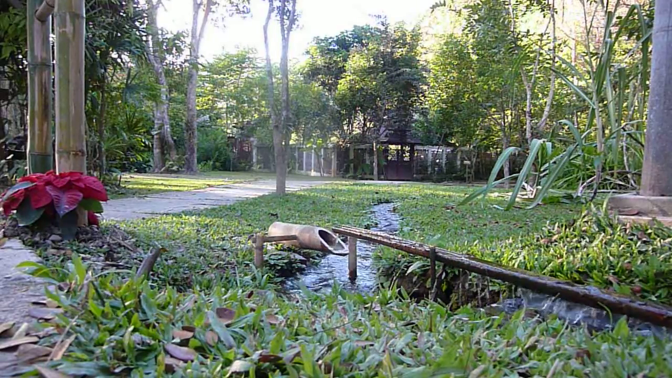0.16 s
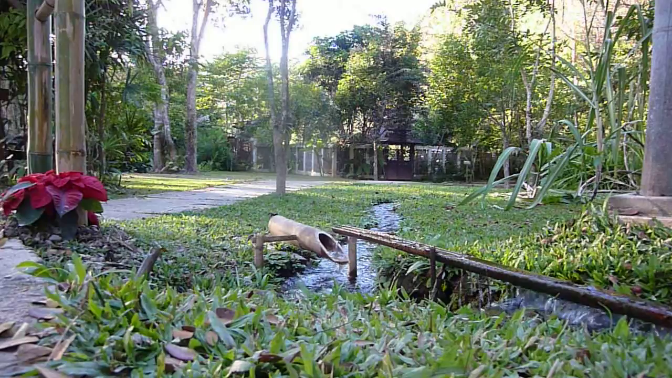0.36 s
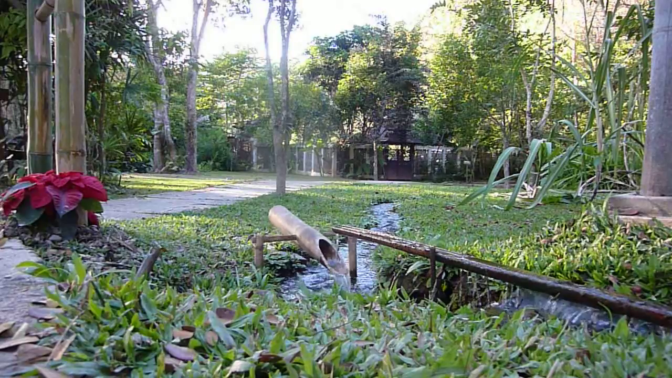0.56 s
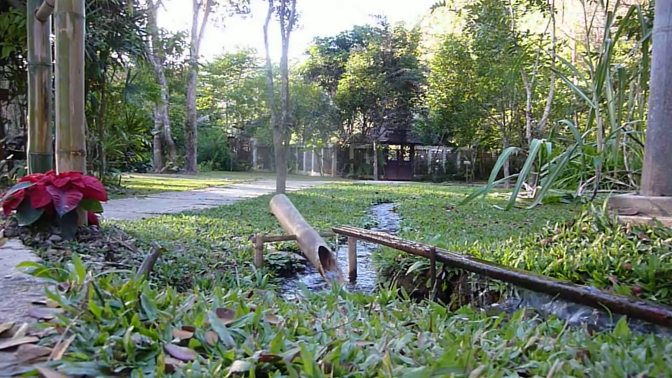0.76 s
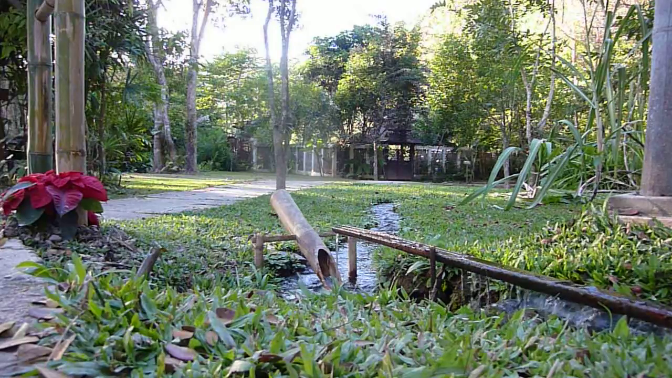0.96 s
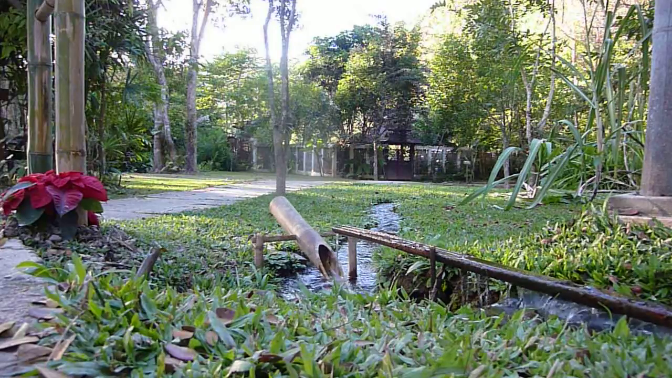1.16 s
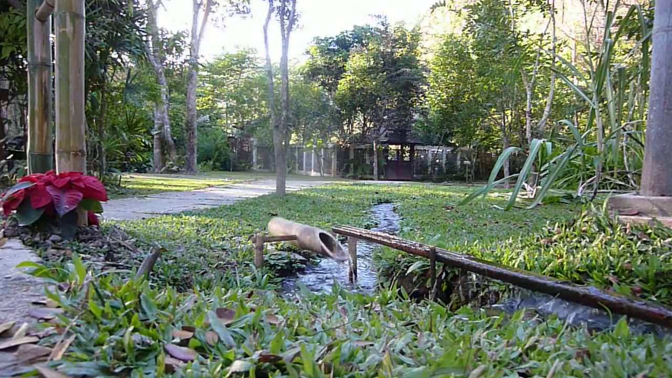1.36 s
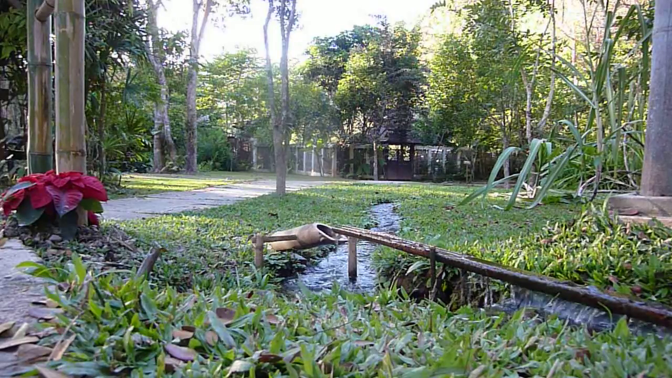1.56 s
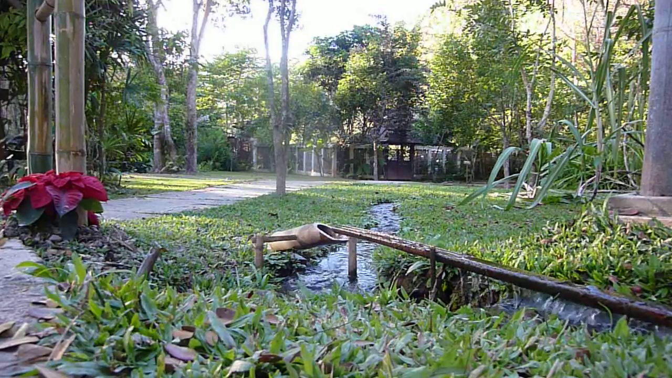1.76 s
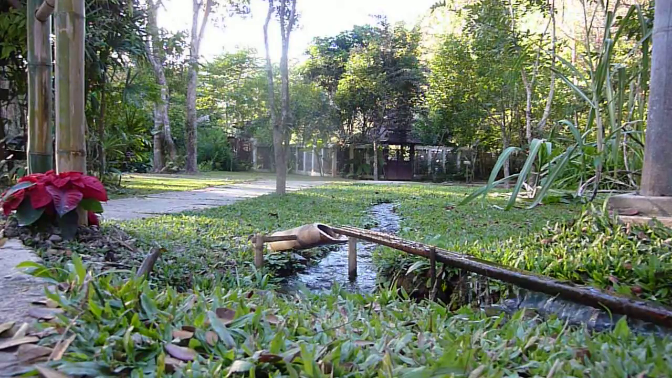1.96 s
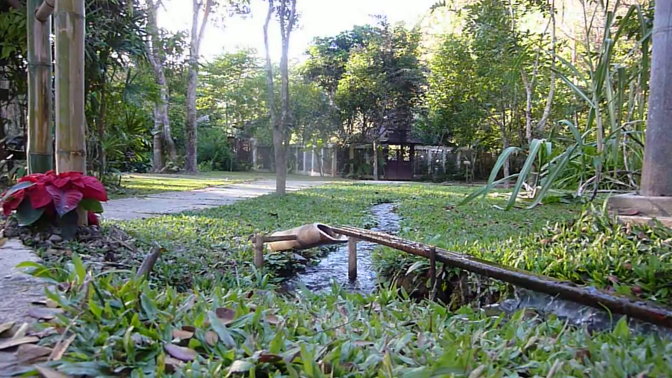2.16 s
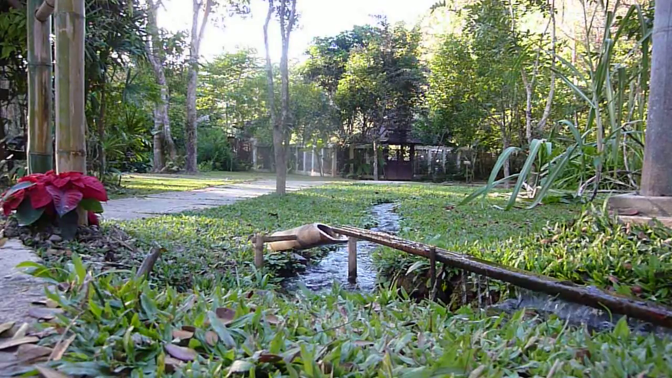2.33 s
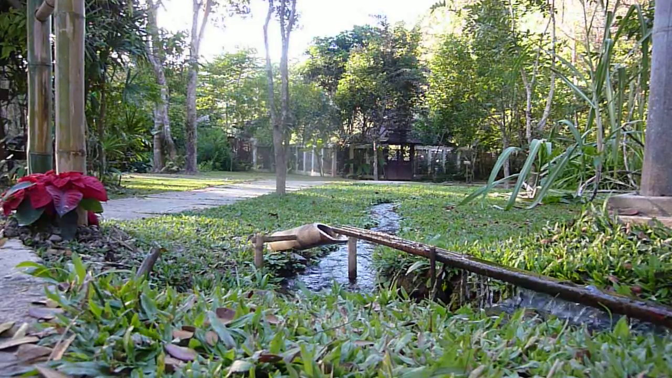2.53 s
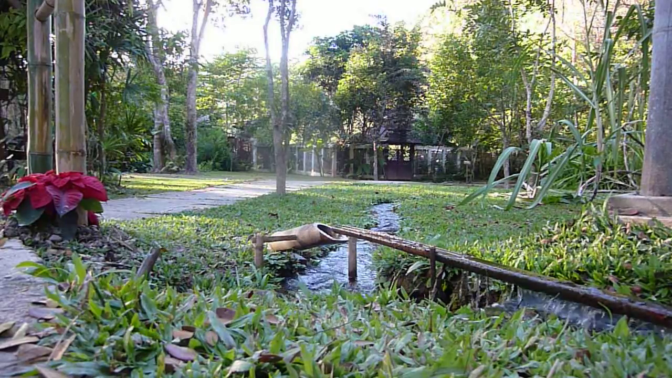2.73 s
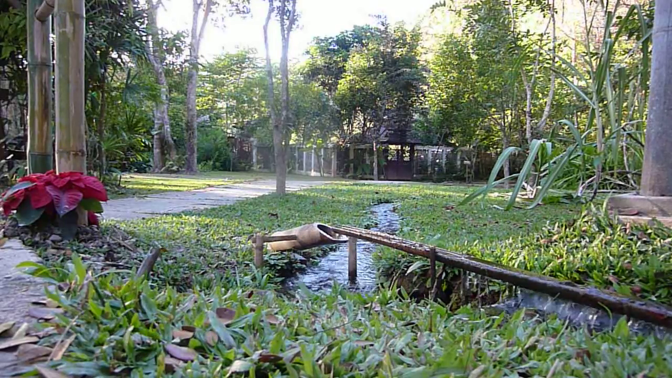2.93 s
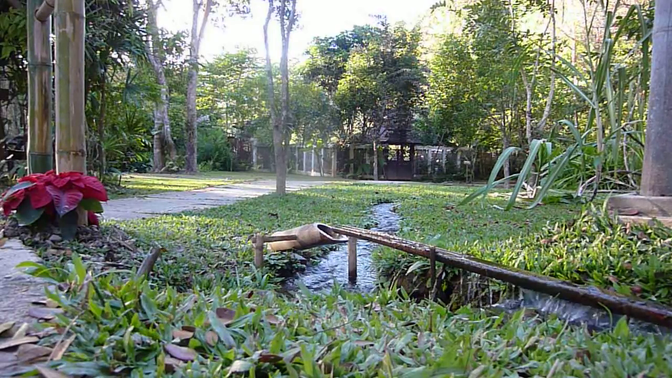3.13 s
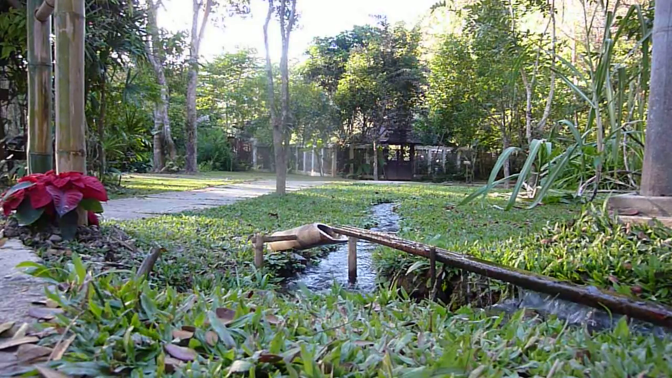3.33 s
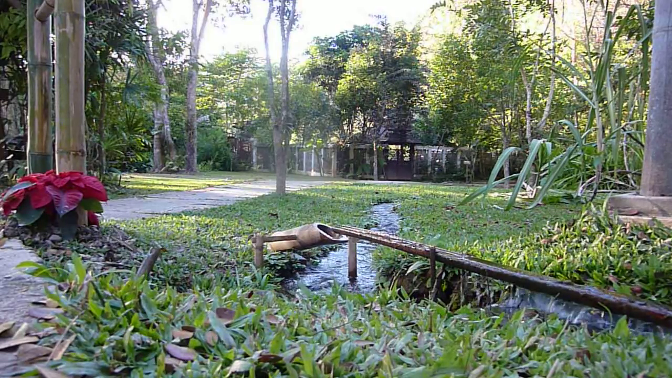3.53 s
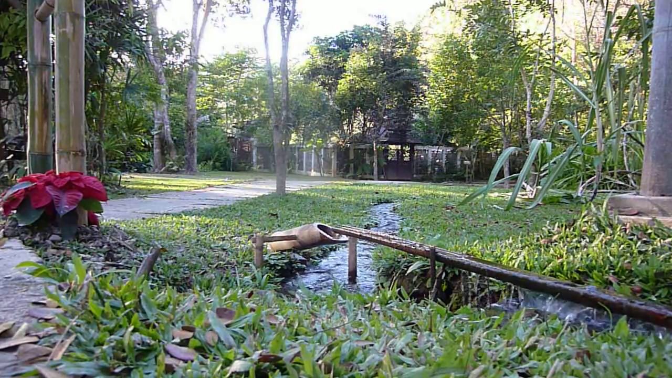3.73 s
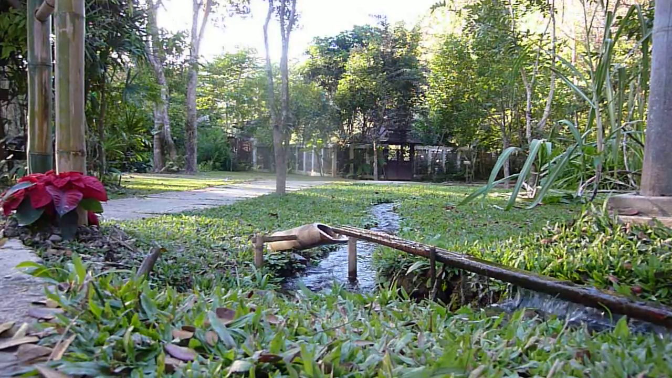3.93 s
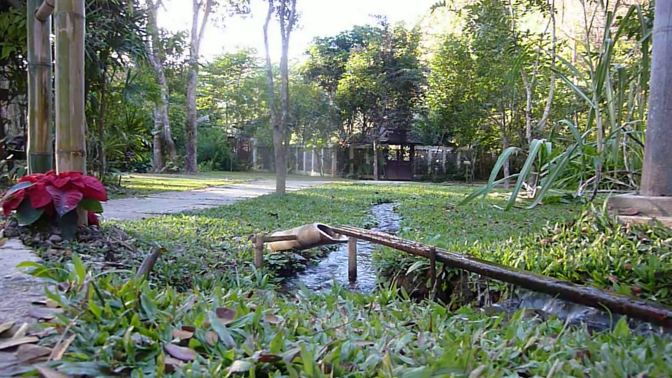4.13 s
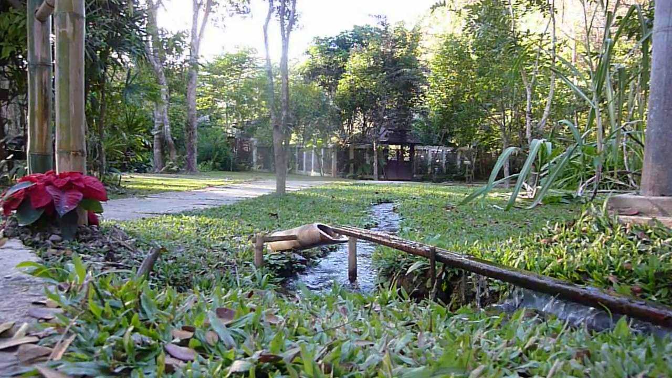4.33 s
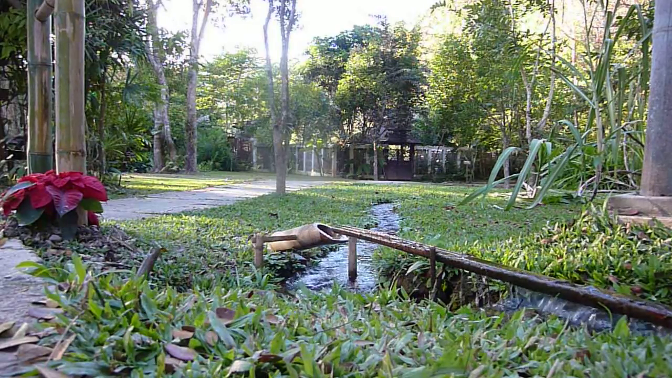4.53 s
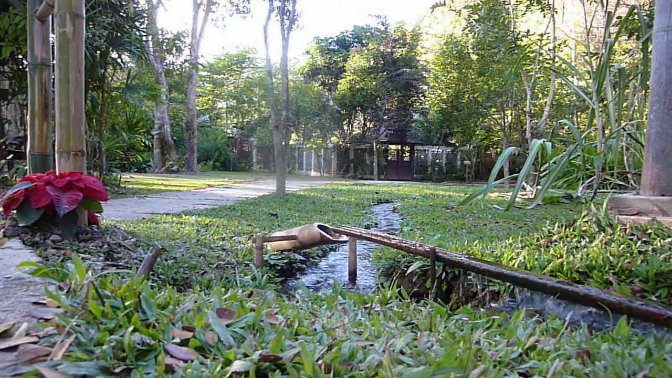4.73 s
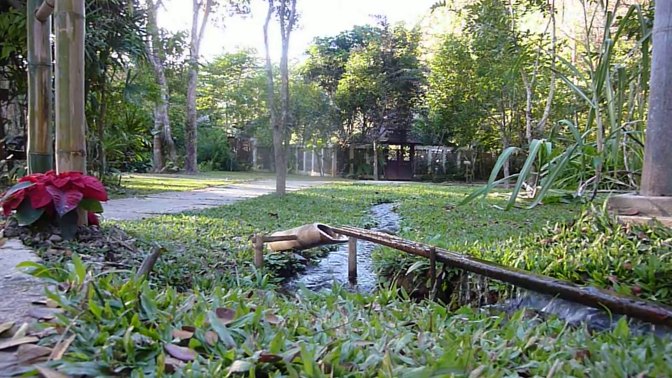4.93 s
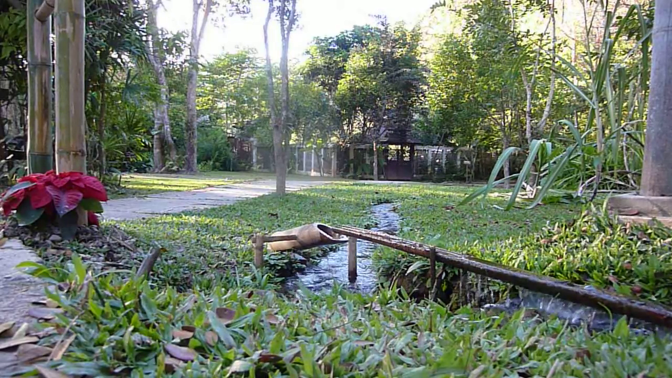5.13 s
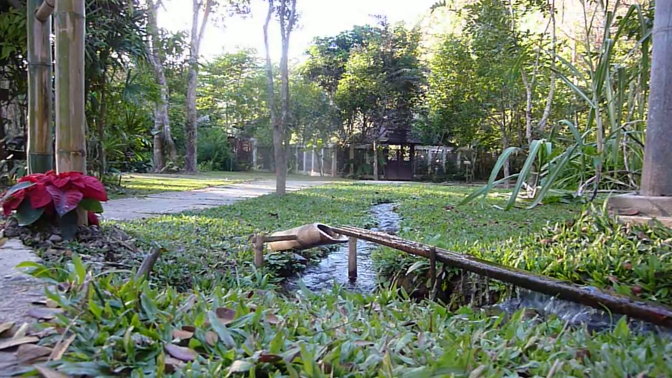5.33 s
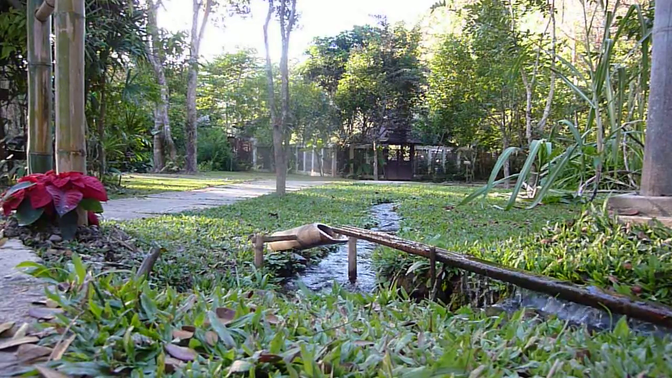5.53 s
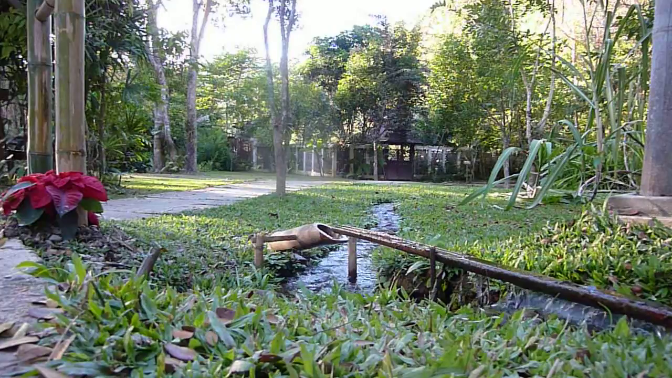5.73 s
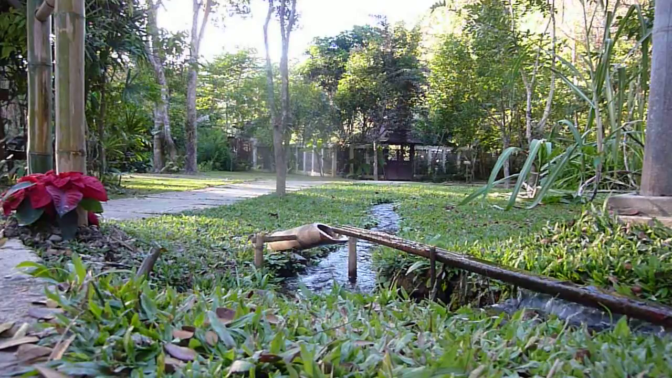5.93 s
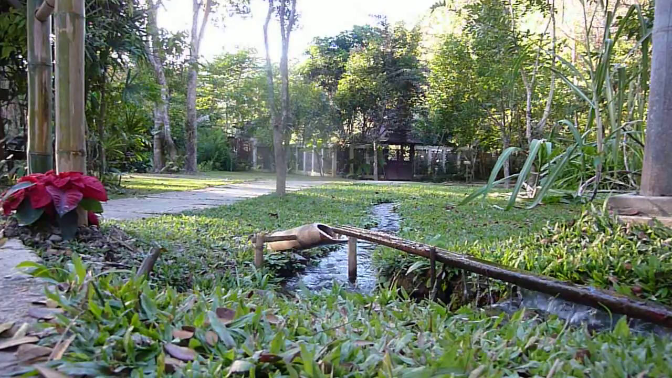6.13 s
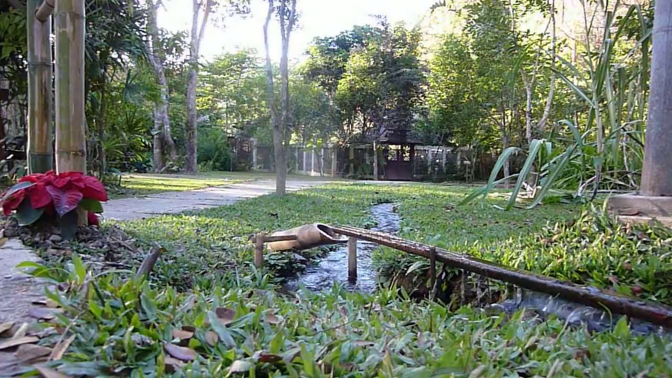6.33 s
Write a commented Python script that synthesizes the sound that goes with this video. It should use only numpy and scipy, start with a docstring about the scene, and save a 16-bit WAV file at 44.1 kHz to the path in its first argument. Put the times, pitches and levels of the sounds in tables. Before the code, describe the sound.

Close, gently stereo garden water: low gurgles, lively midrange babble, fine fizz and scattered plops. Other bamboo tubes knock once early and three times late; between them the tipping spout spills, rattles faintly and strikes hard at a second and a half. Knocks are short, dry and hollow, with a faint outdoor echo and thin tail. Distant birds barely whistle under the water, over a very faint low pump hum.

```python
"""A small garden: a stream babbles under a pivoting bamboo spout that tips, pours, swings back and knocks.
The water is swarms of ringing bubbles over a rush of noise; single plops stand out and pours splash harder.
Each knock of the spout, or of other tubes by the stream, is a thud, a rattle and a fading set of tones.
The trees answer with an echo and a thin tail, faint birds whistle, and a pump hums as one low tone.
A limiter briefly turns everything down after the hardest knock."""
import sys
import numpy as np
from scipy import signal
from scipy.fft import rfft, irfft, next_fast_len
from scipy.io import wavfile
from scipy.ndimage import uniform_filter1d, map_coordinates

SR = 44100
rng = np.random.default_rng(int(sys.argv[2]) if len(sys.argv) > 2 else 0)


def to_wav(s):
    """Save 16-bit WAV."""
    ch = np.atleast_2d(s).T  # columns
    pcm = np.round(np.clip(ch, -1, 1) * 32767)  # PCM
    wavfile.write(sys.argv[1], SR, pcm.astype(np.int16))


N = 285768

# Ringing tones (modes) of the spout, its pivot and the other tubes:
# (frequency [Hz], relative level [dB], time to fade by 60 dB [s])
SPOUT = [(430, -1, 0.023), (554, -4, 0.18), (664, -4.5, 0.18), (952, -18, 0.12), (1214, -15.5, 0.068),
         (1366, -8.5, 0.025), (1640, -16, 0.034)]
PIVOT = [(593, -2, 0.13), (740, -5.5, 0.06), (914, -6.5, 0.2), (1050, -7, 0.15), (1110, -14.5, 0.17),
         (1350, -11.5, 0.13), (1790, -13, 0.035)]
WIDE_TUBE = [(506.2, -0.5, 0.16), (592, -3.5, 0.059), (740, -20.5, 0.072), (974, -27.5, 0.15),
             (1740, -23.5, 0.033)]
SHORT_TUBE = [(493, -6.5, 0.048), (760, 0, 0.12), (780, -19, 0.4), (1385, -6.5, 0.022), (2190, -29, 0.032)]
LONG_TUBE = [(414.7, -3, 0.15), (470.6, -3, 0.24), (547, -19, 0.019), (1080, -22, .025)]
SPLIT_TUBE = [(451, 7.5, 0.037), (554, -0.5, .17), (804, -1.5, 0.16), (918, -13, 0.28), (1167, -6.5, 0.059),
              (1440, -20, 0.055)]
# Knocks: (time [s], level [dB], rise of the ring [s], relative thud level [dB], relative rattle level [dB],
# change of the ring's level about 46 ms after the blow [dB; below 0 dies sooner, above 0 swells],
# echo delay [s], relative echo level [dB], modes [table above])
KNOCKS = [ (0.2403, -7, .0015, -12, -23.5, -10, 0.082, -16, WIDE_TUBE),
          (1.3426, -22.5, 0.0018, -1.5, -3.5, 8, 0.041, -13.5, PIVOT),
          (1.5043, 3, 0.0032, -7, -15.5, -9, 0.13, -25, SPOUT),
          (5.0920, -6, 0.0015, -4, -25, 2, 0.16, -11, SHORT_TUBE),
          (5.1726, -9, 0.0027, -6.5, -23.5, -17.5, .072, -15.5, LONG_TUBE),
          (6.163, -14.5, 0.002, -1.5, -11.5, 3.5, .15, -26, SPLIT_TUBE), ]
# The largest single bubbles, mixed with a 3 dB trim: (time [s], pitch [Hz], level before the trim [dB])
PLOPS = [(0.853, 1610, -29), (0.865, 427, -28), (1.078, 466, -30.5), (1.08, 1010, -33),
         (2.128, 1820, -30.5), (2.445, 1114, -32.5), (2.818, 1094, -30), (2.856, 397, -27.5),
         (2.858, 640, -30.5), (2.983, 1344, -28.5), (3.457, 1270, -30), (3.921, 1038, -32.5),
         (4.2, 382, -24.5), (4.344, 1013, -29.5), (4.682, 371, -32.5), (5.427, 414, -28.5),
         (5.49, 2440, -30.5), (5.921, 1080, -28)]
# Tone balance of the rushing water: (frequency [Hz], relative level [dB])
WASH_TONE = [(25, -24.5), (70, -15.5), (130, -17.5), (190, -14), (260, -13.5), (375, -2), (520, -3.5),
             (760, -7), (1100, -13), (1750, -10), (2150, -18.5), (2700, -13.5), (3600, -19.5), (7600, -20)]
# How alike the rush is in left and right: (frequency [Hz], likeness [1 = identical])
ALIKE = [(200, 0.97), (1000, 1), (2000, 0.83), (4000, 0.83), (8000, 0.39)]
# How long the tail from the trees lasts: (frequency [Hz], time to fade by 60 dB [s])
TREE_FADE = [(200, 0.92), (550, 1.0), (1500, 0.22), (6000, 0.083)]
# Treble roll-off of the microphone: (frequency [Hz], gain [dB])
MICROPHONE = [(7600, 0), (7950, -17.5), (8400, -12), (8800, -27)]
# Far birds: (time [s], length [s], start pitch [Hz], end pitch [Hz], level [dB])
BIRDS = [(2.751, 0.011, 5200, 5120, -37), (3.308, 0.018, 5000, 5200, -46), (3.336, 0.15, 2060, 2350, -51),
         (3.505, 0.091, 2420, 2220, -51), (3.662, 0.022, 5200, 5080, -44.5)]
# A tipping tube spills water into the stream: (time [s], hold until fading [s], extra splashing [dB])
POURS = [(0.12, 0.18, 1.5), (0.68, 0.79, 1.5), (5.078, 0.32, 1.1)]

TOP_HZ = 8850  # nothing is left above this
POUR_RISE_S, POUR_FADE_S = 0.11, 0.12  # the spill builds up, then the pool calms
STEADY_SPLASH_DB = 1.3  # splashing of the stream alone
# Lesser plops: one at a random moment in each equal time slot, with random pitch and level
STRAY_PER_S, STRAY_HZ = 2.5, 1148  # slots per second, middle pitch
STRAY_OCTAVES, STRAY_DB = 0.7, -36  # furthest pitch from the middle, middle level before the trim


def amp(db):
    """Turn decibels into a gain."""
    return 10 ** (np.asarray(db) / 20)


def unit(x):
    """Scale a sound to an average (rms) strength of 1."""
    return x / np.sqrt(np.mean(x ** 2) + 1e-20)


def along(points, hz):
    """Read a curve of (frequency, value) points, with frequency on a log axis."""
    f, value = np.transpose(points)
    return np.interp(np.log(hz + 1), np.log(f + 1), value)


def wobble(rate):
    """A smooth random curve with the given number of random points a second."""
    knots = rng.standard_normal(int(N * rate / SR) + 4)
    return map_coordinates(knots, [np.arange(N) * rate / SR])


def filtered(x, response):
    """Shape a sound by a gain that depends on frequency."""
    size = next_fast_len(N + SR // 2)
    spectrum = rfft(x, size) * response(np.fft.rfftfreq(size, 1 / SR))
    return irfft(spectrum, size)[..., :N]


def band(x, low_hz, high_hz):
    """Keep mainly the frequencies between two limits."""
    sos = signal.butter(2, [low_hz, high_hz], "band", fs=SR, output="sos")
    return signal.sosfilt(sos, x)


def add(track, s, sound):
    """Mix a sound into a track, starting at s seconds."""
    part = track[max(round(s * SR), 0):][:len(sound)]
    part += sound[:len(part)]


def splash_db():
    """How hard the water splashes over time: steady, plus a rise, hold and fade for each pour."""
    t = np.arange(N) / SR
    total = STEADY_SPLASH_DB
    for s, length, db in POURS:
        rise = np.clip((t - s) / POUR_RISE_S, 0, 1)
        fade = np.exp(-np.maximum(t - s - length, 0) / POUR_FADE_S)
        total = total + db * rise * fade
    return total


def bubble(cycles, life, glide):
    """A bubble swells softly, fades over about life cycles and rises in pitch as it nears the surface."""
    age = np.maximum(cycles, 0) / life
    swell_and_fade = 2 * (1 - np.exp(-4 * age)) * np.exp(-age)
    return swell_and_fade * np.sin(2 * np.pi * cycles * (1 + glide * (age - 1)))


def bubbles(rate, centre_hz, octaves, life, spread_db, clump_db):
    """A stereo swarm of rms 1: bubbles of random pitch and loudness, stronger in clumps."""
    count = int(rate * N / SR)
    start = rng.integers(0, N, count)
    pitch, size, ring, side = np.clip(rng.standard_normal((4, count, 1)), -2.2, 2.2)
    hz = centre_hz * 2 ** (octaves * pitch)
    # the deep gurgles do not follow the pours
    clumps_db = clump_db * wobble(24) + splash_db() * (centre_hz > 700)
    gain = amp(spread_db * size + clumps_db[start, None])
    n = np.arange(min(int(7 * life * SR / centre_hz), SR // 10))
    lag = side * 2.2e-5  # [s] each bubble reaches left and right at slightly different times
    sides = []
    for shift in (lag, -lag):
        rings = gain * bubble(hz * (n / SR + shift), life * amp(2.7 * ring), glide=0.005)
        sides.append(np.bincount((start[:, None] + n).ravel(), rings.ravel(), N)[:N])
    return unit(np.array(sides))


def wash(patchy_db):
    """Countless far bubbles merge into a patchy stereo rush of noise with rms 1."""
    z = signal.stft(rng.standard_normal((2, N)), nperseg=256)[2]
    # random patches of louder and softer, smoothed over frequency and then time
    patches = uniform_filter1d(rng.standard_normal(z.shape[1:]), size=4, axis=0)
    patches = uniform_filter1d(patches, size=6, axis=1)
    pair = signal.istft(z * amp(patchy_db * unit(patches)), nperseg=256)[1][:, :N]

    def tone_and_width(hz):
        turn = np.arccos(np.clip(along(ALIKE, hz), -1, 1)) / 2
        return amp(along(WASH_TONE, hz)) * [np.cos(turn), np.sin(turn)]

    mid, side = filtered(pair, tone_and_width)
    return unit(np.array([mid + side, mid - side]))


def stream():
    """Running water: deep gurgles, rounder drips, babbling, fine fizz and sparse spray over the wash."""
    gurgle = amp(-48.5) * bubbles(rate=240, centre_hz=403.3, octaves=0.23, life=1.87, spread_db=3.0, clump_db=1.0)
    drips = amp(-53.5) * bubbles(rate=50, centre_hz=1119, octaves=0.16, life=6.4, spread_db=3.5, clump_db=1.0)
    babble = amp(-50.5) * bubbles(rate=480, centre_hz=1544, octaves=0.445, life=4.24, spread_db=5.0, clump_db=2.5)
    fizz = amp(-58.5) * bubbles(rate=350, centre_hz=4380, octaves=0.42, life=14, spread_db=4.5, clump_db=3.5)
    spray = amp(-63.0) * bubbles(rate=25, centre_hz=4300, octaves=0.5, life=1.9, spread_db=3.5, clump_db=2.5)
    flow_db = 1.13 * splash_db() + 0.8 * wobble(16)
    rush = amp(-45.5 + flow_db) * wash(patchy_db=2.5)
    return gurgle + drips + babble + fizz + spray + rush


def pump(hum_hz, db):
    """A pump's mains hum: one low tone whose level wavers slightly."""
    tone = np.sin(2 * np.pi * hum_hz * np.arange(N) / SR)
    return amp(db + 0.4 * wobble(6)) * unit(tone)


def plops():
    """Single large bubbles stand out of the babble; the deep ones die within a few cycles."""
    out, t = np.zeros(N), np.arange(SR // 12) / SR
    strays = []
    for slot in range(int(STRAY_PER_S * N / SR)):
        when, pitch, size = rng.uniform(-1, 1, 3)
        s = (slot + (1 + when) / 2) / STRAY_PER_S
        strays.append((s, STRAY_HZ * 2 ** (STRAY_OCTAVES * pitch), STRAY_DB + 2 * size))
    for s, hz, db in PLOPS + strays:
        life = 5.1 * (hz / 1000) ** 0.7  # [cycles]
        add(out, s, amp(db - 3.0) * bubble(hz * t, life, glide=0.006))
    return out


def trees(x):
    """Trunks and foliage scatter the sound into a thin, fading stereo tail."""
    hz, t, z = signal.stft(rng.standard_normal((2, SR)), SR, nperseg=256)
    fade = amp(-60 * t / along(TREE_FADE, hz)[:, None])
    mid, side = signal.istft(z * fade, SR, nperseg=256)[1]
    tail = np.array([mid + 0.14 * side, mid - 0.2 * side]) / np.linalg.norm(mid)
    return signal.fftconvolve(x[None], tail, axes=1)[:, :N]


def knocks(thud_hz, thud_s, change_s, rattle_t60, echo_rise_s, slosh):
    """A blow thuds, rattles the cane and rings the air in the tube; the trees send back an echo and a tail."""
    near, far, t = np.zeros(N), np.zeros(N), np.arange(SR // 2) / SR
    # change_s after the blow, the ring drops in some knocks and swells in others
    changed = (1 + np.tanh((t - change_s) / 0.0025)) / 2
    for s, db, rise, thud_db, rattle_db, change_db, delay, echo_db, modes in KNOCKS:
        # water sloshing inside blurs the tones
        steps = rng.standard_normal((len(modes), len(t)))
        drift = slosh * np.cumsum(steps, axis=1) / np.sqrt(SR)
        ring = np.zeros(len(t))
        for k, (hz, level, t60) in enumerate(modes):
            tone = np.sin(2 * np.pi * hz * t + drift[k])
            ring += (-1) ** k * amp(level - 60 * t / t60) * tone
        ring = ring * (1 - np.exp(-t / rise))
        thud = t / thud_s * np.exp(1 - t / thud_s) * np.sin(2 * np.pi * thud_hz * t)
        rattle = unit(band(rng.standard_normal(len(t)), low_hz=454, high_hz=1210))
        rattle = rattle * amp(-60 * t / rattle_t60)
        snap = unit(band(rng.standard_normal(len(t)), low_hz=1190, high_hz=6000))
        snap = snap * amp(-60 * t / 0.0053)
        blow = ring * amp(change_db * changed) + amp(thud_db) * thud + amp(rattle_db) * rattle
        # the bright crack grows faster than the blow itself
        blow = amp(db) * blow + amp(1.7 * db - 27.5) * snap
        echo = amp(echo_db) * band(blow, low_hz=300, high_hz=580)  # foliage swallows the upper tones
        add(near, s, blow)
        add(near, s + delay, 2.27 * echo * (1 - np.exp(-t / echo_rise_s)))
        add(far, s, echo)
    # a narrow cane radiates little bass
    return band(near, low_hz=156, high_hz=4930) + amp(-2.5) * trees(far)


def birds(waver):
    """Faint whistles and chips: gliding tones whose pitch shakes a little, so they sound slightly rough."""
    out = np.zeros(N)
    for s, length, start_hz, end_hz, db in BIRDS:
        hz = np.linspace(start_hz, end_hz, round(length * SR))
        hz = hz * (1 + waver * wobble(400)[:len(hz)])
        tone = np.sin(2 * np.pi * np.cumsum(hz) / SR)
        add(out, s, amp(db) * np.hanning(len(hz)) * tone)
    return out


def scene():
    """Mix all sources: everything lies slightly to the right, the running water most."""
    bamboo = knocks(thud_hz=670, thud_s=0.00056, change_s=0.046, rattle_t60=0.069, echo_rise_s=0.017, slosh=0.82)
    water = amp([[-0.3], [0.3]]) * (stream() + plops())
    mix = bamboo + water + birds(waver=0.0098) + pump(hum_hz=99.8, db=-59.5)
    left_lag_s = 2.8e-5  # the left side hears everything this much later

    def side_delay(hz):
        return np.exp(np.outer([-1j, 1j], np.pi * hz * left_lag_s))

    return amp([[-0.6], [0.6]]) * filtered(mix, side_delay)


def limiter(x, top_db, attack_s, release_db):
    """Peaks over the top pull the gain down; it recovers by release_db decibels a second."""
    over = np.maximum(20 * np.log10(np.abs(x).max(axis=0) + 1e-9) - top_db, 0)
    ramp = release_db * np.arange(N) / SR
    held = np.maximum.accumulate(over + ramp) - ramp
    pole = np.exp(-1 / (attack_s * SR))
    cut_db = signal.lfilter([1 - pole], [1, -pole], held)  # the gain cannot drop at once
    return x * amp(-cut_db)


def record(dry):
    """Cut a narrow notch and roll off the treble, then limit, clip and remove all above the top."""
    notch_hz = 5430

    def microphone(hz):
        notch = (hz - notch_hz) / (hz - notch_hz - 130j)
        return notch * amp(along(MICROPHONE, hz))

    sound = filtered(dry, microphone)
    sound = limiter(sound, top_db=-5.5, attack_s=0.0043, release_db=59.0)
    sound = np.clip(sound, -1, 1)
    return filtered(sound, lambda hz: hz < TOP_HZ)


dry = scene()
out = record(dry)
to_wav(out)
```